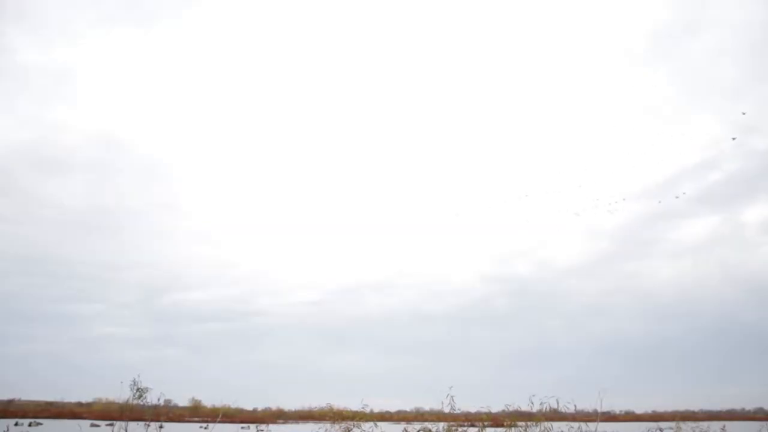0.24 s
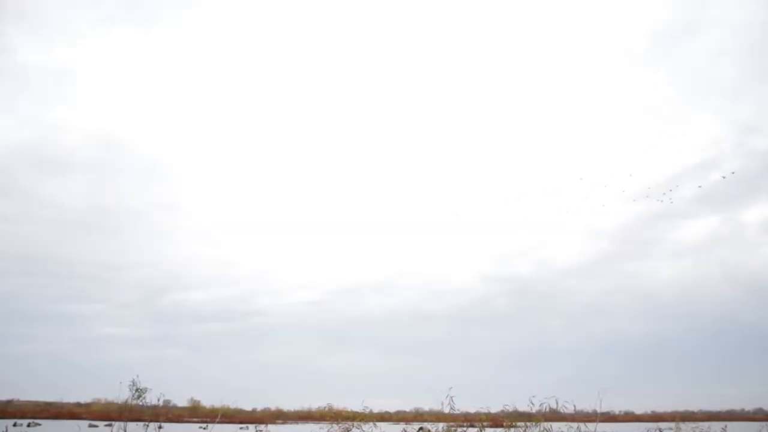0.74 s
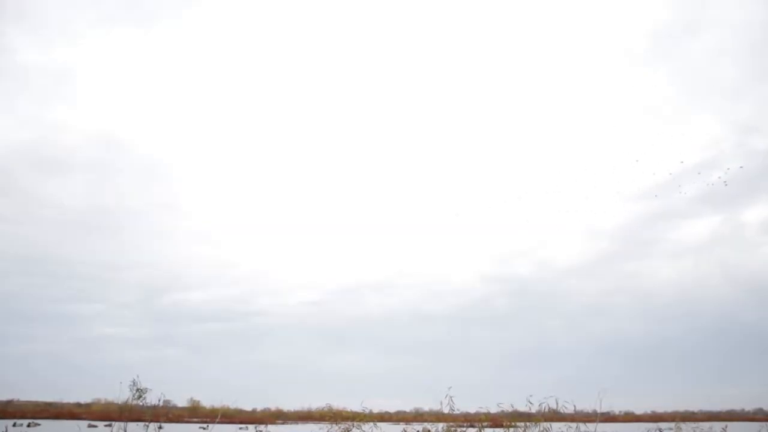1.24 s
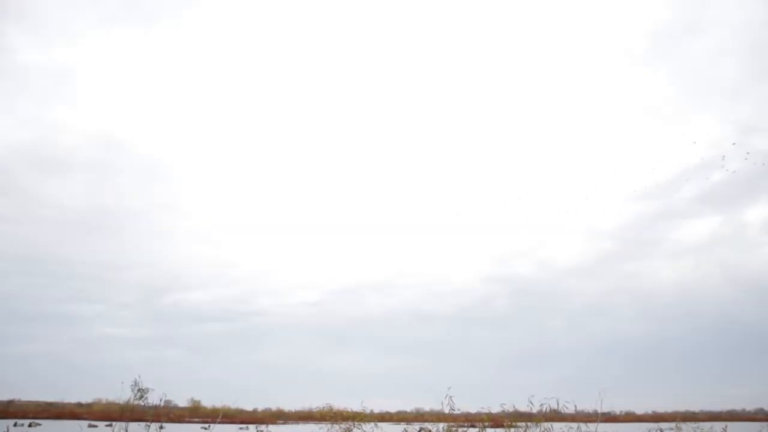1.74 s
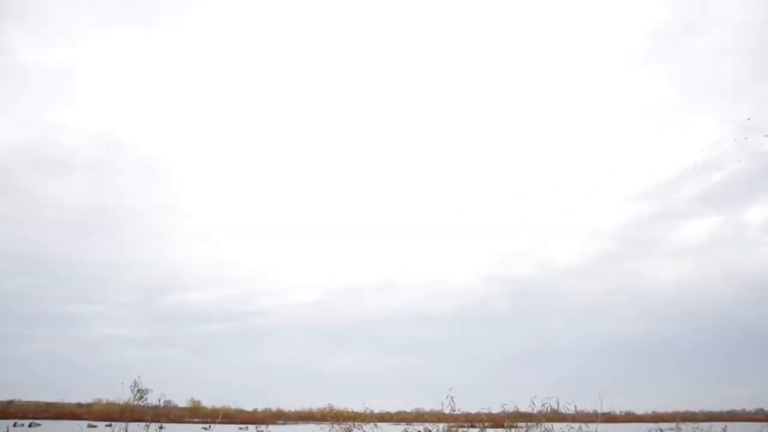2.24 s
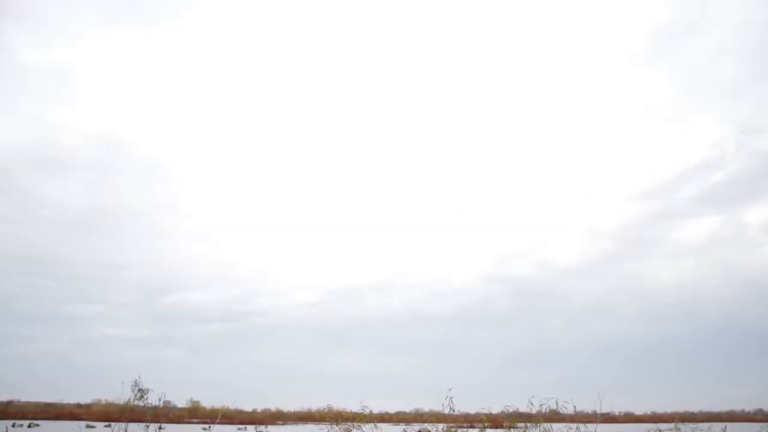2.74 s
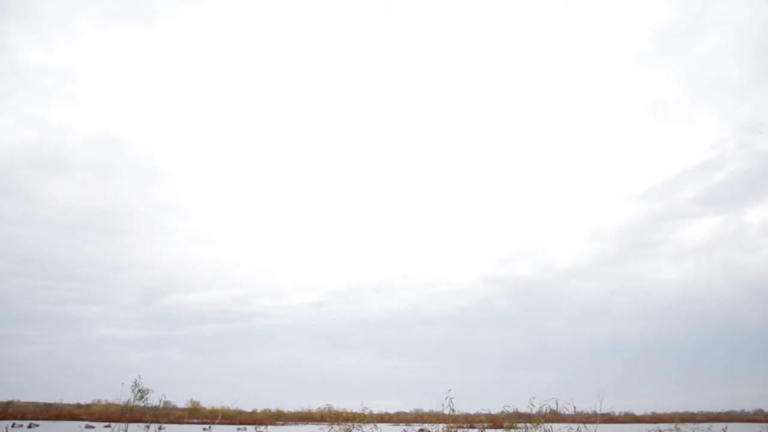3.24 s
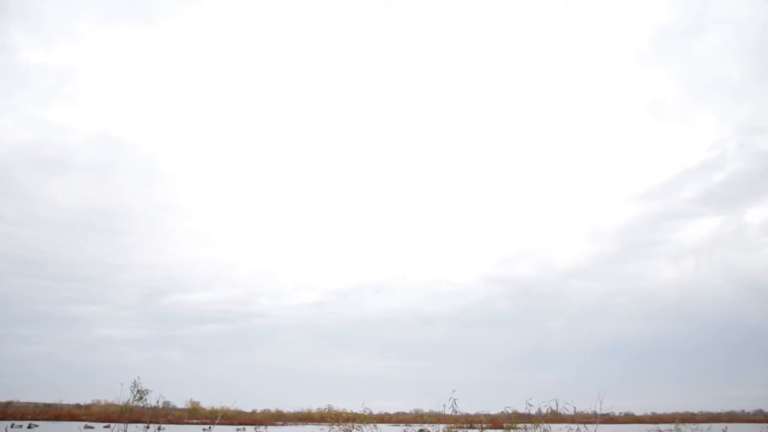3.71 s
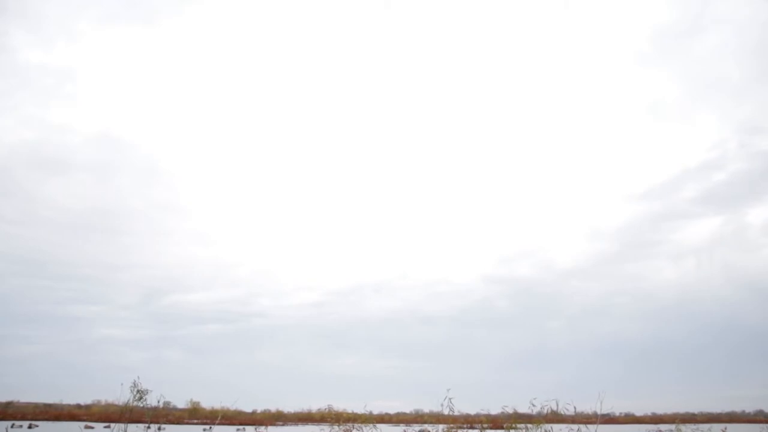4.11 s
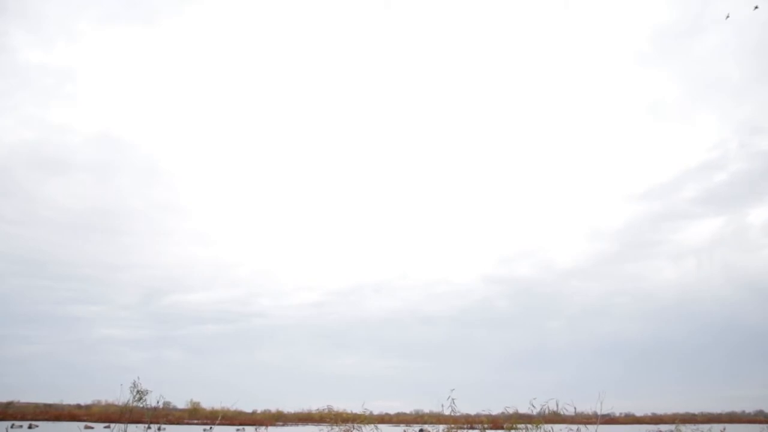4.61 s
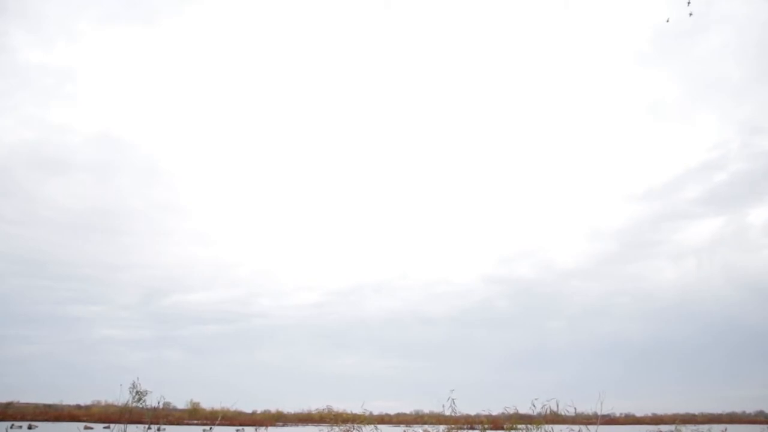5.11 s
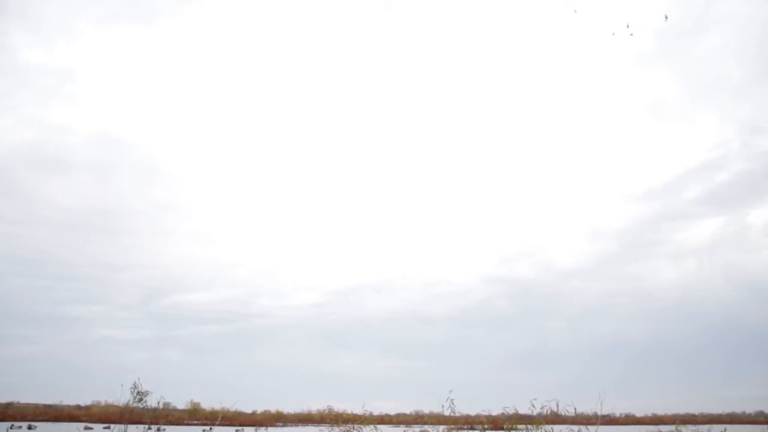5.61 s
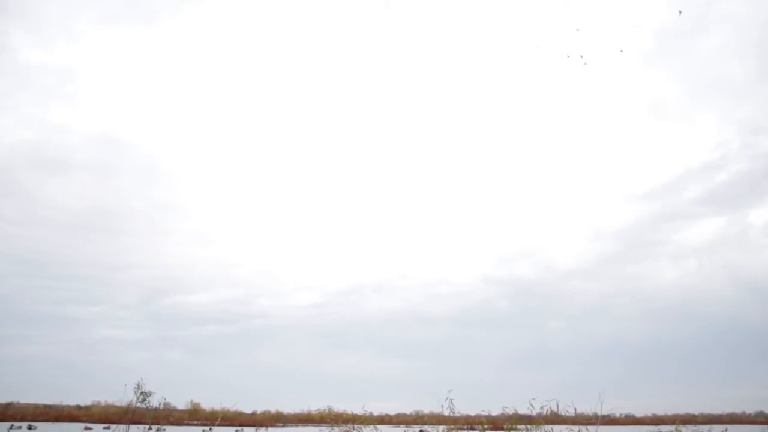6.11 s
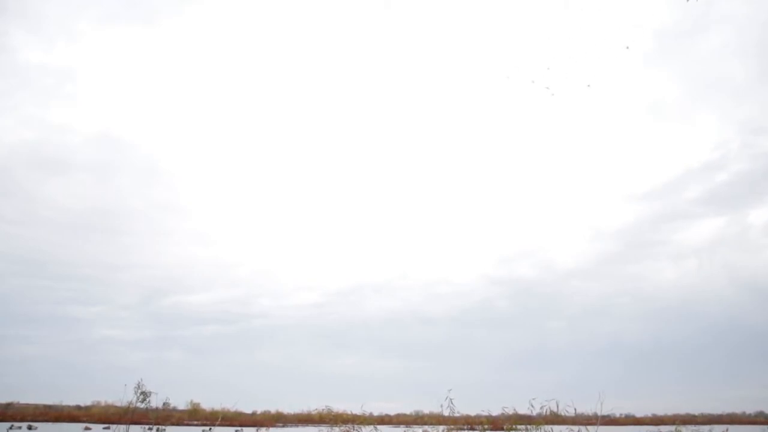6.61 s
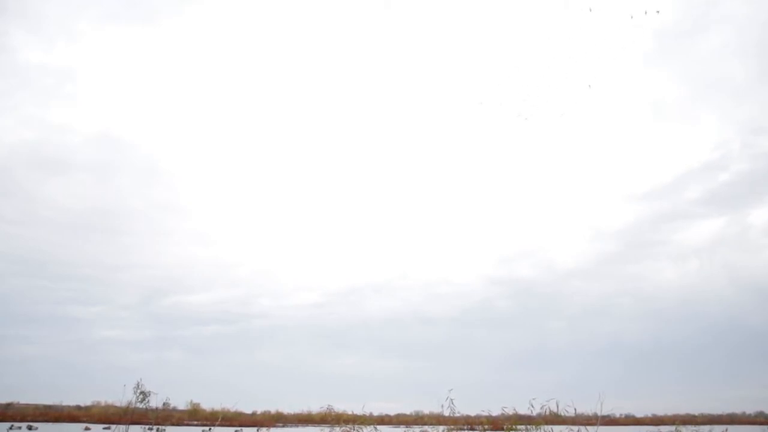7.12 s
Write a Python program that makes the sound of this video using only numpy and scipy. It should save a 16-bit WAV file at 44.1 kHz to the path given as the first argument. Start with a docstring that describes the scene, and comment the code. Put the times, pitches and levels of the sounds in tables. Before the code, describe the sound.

Quiet open marsh with a few faint duck quacks, soft camera button clicks, then a sleeve rustle, a loud buckle clack and a sharp plastic snap.

```python
"""Quiet marsh, handling close by

Far off: ducks quack, a waterbird cries (harmonics sagging in pitch), a hoot arches, dry ticks, a low drone.
At the microphone: air and hiss as steady coloured noise, a breeze as low noise with eddies and gusts.
Near: five camera button presses, made of spring ticks, rubbing noise, knocks and a body thud.
Close: a sleeve rustles as noise strokes, a buckle clacks and rattles as struck modes and scrapes,
and a plastic catch slides, then snaps shut as a ring and a crack."""
import sys
import numpy as np
from scipy import signal
from scipy.fft import rfft, irfft
from scipy.io import wavfile

SR = 44100
rng = np.random.default_rng(int(sys.argv[2]) if len(sys.argv) > 2 else 0)


def generate_wav(sig):
    """Save sig (samples, or channels by samples) to the path in sys.argv[1] as 16-bit PCM at SR."""
    pcm = np.round(np.clip(np.atleast_2d(sig).T, -1, 1) * 32767).astype(np.int16)
    wavfile.write(sys.argv[1], SR, pcm)


N = 324311
TIME = np.arange(N) / SR  # the whole scene, s
AGE = np.arange(8192) / SR  # time since the start of one short sound, s


def gain_of(db):
    """Amplitude factor for a level in dB."""
    return 10 ** (np.asarray(db) / 20)


def evened(x):
    """Scaled to rms 1."""
    return x / np.sqrt(np.mean(x ** 2) + 1e-20)


def unit(x):
    """Scaled to energy 1 in each channel."""
    return x / np.sqrt(np.sum(x ** 2, axis=-1, keepdims=True) + 1e-20)


def read(points, hz):
    """A spectrum table joined by straight lines over log frequency."""
    f, value = np.transpose(points)
    return np.interp(np.log(hz + 1), np.log(f + 1), value)


def add(mix, s, sound):
    """Mixes a sound in at time s."""
    part = mix[:, round(s * SR):][:, :sound.shape[-1]]
    part += sound[..., :part.shape[1]]


def sides(pan_db):
    """Left and right gains for a left-minus-right level difference."""
    gains = gain_of(np.array([[.5], [-.5]]) * pan_db)
    return gains / np.sqrt(np.mean(gains ** 2, axis=0))


def highpass(x, hz):
    """Second-order bass cut."""
    return signal.sosfilt(signal.butter(2, hz, "high", fs=SR, output="sos"), x)


def dying(t, t60):
    """Exponential decay by 60 dB in t60 seconds."""
    return np.exp(-np.log(1000) * t / t60)


def partly_alike(a, b, same):
    """Two channel spectra that share the fraction same, from -1 to 1."""
    return np.array([a, same * a + np.sqrt(1 - same ** 2) * b])


def noise(spectrum, same, pan_db=0):
    """Two channels of coloured, partly alike noise of rms 1."""
    a, b = rfft(rng.standard_normal((2, N)))
    pair = partly_alike(a, b, same) * sides(pan_db)
    colour = gain_of(read(spectrum, np.fft.rfftfreq(N, 1 / SR)))
    return evened(irfft(pair * colour, N))


def wobble(per_s, size=N):
    """A smooth random curve of rms 1, lowpassed at per_s Hz."""
    lowpass = signal.butter(2, per_s, fs=SR, output="sos")
    settled = signal.sosfilt(lowpass, rng.standard_normal(size + SR))[SR:]
    return evened(settled)


def coloured(x, hz, octaves):
    """A causal (minimum-phase) bell-shaped filter around hz."""
    f = abs(np.fft.fftfreq(x.shape[-1], 1 / SR)) + 1
    log_gain = np.maximum(-.5 * (np.log2(f / hz) / octaves) ** 2, -np.log(1000))  # floor at -60 dB
    response = np.exp(np.conj(signal.hilbert(log_gain)))
    return np.fft.ifft(np.fft.fft(x) * response).real


def mode(hz, t60, rise, delay=0):
    """One dying vibration that builds up over rise seconds."""
    t = np.maximum(AGE - delay, 0)
    return np.sin(2 * np.pi * hz * t) * (1 - np.exp(-t / rise)) * dying(t, t60)


def ring(modes, travel, low_hz, build_cycles=0.77):
    """Modes of a struck part, each built up over build_cycles; bending waves carry the high ones fastest."""
    top = max(m[0] for m in modes)
    body = 0
    for k, (hz, db, t60) in enumerate(modes):
        delay = travel * (np.sqrt(top / hz) - 1)
        body = body + (-1) ** k * gain_of(db) * mode(hz, t60, build_cycles / hz, delay)
    return unit(highpass(body, low_hz))


def burst(t60, low_hz=600, apart_hz=8000):
    """A dying scrape of noise, unlike at the two ports in the treble; small parts radiate no bass."""
    a, b = rfft(rng.standard_normal((2, len(AGE))))
    same = np.exp(-(np.fft.rfftfreq(len(AGE), 1 / SR) / apart_hz) ** 2)
    pair = irfft(partly_alike(a, b, same))
    return highpass(pair * (1 - np.exp(-AGE / 0.00049)) * dying(AGE, t60), low_hz)


def scatter(x, t60, hz, octaves):
    """Diffuse echoes from the surroundings: convolution with dying coloured noise."""
    t = np.arange(SR) / SR
    tail = rng.standard_normal((2, SR)) * (1 - np.exp(-t / 0.0067)) * dying(t, t60)
    return signal.fftconvolve(x, unit(coloured(tail, hz, octaves)), axes=1)[:, :N]


# still air and microphone hiss, relative spectrum: f/Hz, level/dB per Hz
AIR_SPECTRUM = [(12, -38), (20, -5), (42, -13), (85, -5.5), (113, -7), (167, -9), (240, -11), (386, -13),
                (496, -14.5), (637, -15), (1080, -16.5), (2120, -19), (4500, -18.5), (15800, -21)]
# likeness of the hiss at the two ports: f/Hz, correlation (0-1)
AIR_LIKENESS = [(40, 0), (150, 0.33), (400, 0.1), (1000, 0.14), (2500, 0.13), (6000, 0.0029), (15000, 0)]
# balance of the hiss: f/Hz, left minus right level/dB
AIR_BALANCE = [(40, -0.91), (150, 1), (1000, 0.98), (5000, -0.12), (15000, 0.12)]
# far drone over the open land, before its waver: t/s, level/dB
DRONE_SWELL = [(0, -80), (1.6, -76), (2.1, -75), (2.8, -70.5), (3.3, -69), (3.7, -74), (5.5, -76),
               (6.4, -71), (7.35, -73.5)]
# relative spectrum of the drone: f/Hz, level/dB per Hz
DRONE_SPECTRUM = [(100, -39), (300, -5), (440, -2.5), (560, -7), (900, -17), (3000, -59)]
HISS_DB = -54.58


def air(waver_db=2):
    """Steady wash and microphone hiss, with a far drone that swells, fades and wavers."""
    hz = np.fft.rfftfreq(N, 1 / SR)
    hiss = gain_of(HISS_DB) * noise(AIR_SPECTRUM, read(AIR_LIKENESS, hz), read(AIR_BALANCE, hz))
    swell_db = np.interp(TIME, *np.transpose(DRONE_SWELL)) + waver_db * wobble(7.1)
    return hiss + gain_of(swell_db) * noise(DRONE_SPECTRUM, 0.58)


# breeze on the microphone dropping to a lull, before eddies and gusts: t/s, level/dB
BREEZE_STRENGTH = [(0, -54), (.5, -52), (.92, -56), (1.3, -53), (2.0, -61), (2.6, -54.5), (2.76, -68.5),
                   (5.6, -69), (6.1, -62.5), (7.35, -70)]
# relative spectrum of the buffeting: f/Hz, level/dB per Hz
BUFFET_SPECTRUM = [(12, -12.5), (25, 0), (50, -1.5), (80, -7), (130, -19.5), (250, -32.5), (600, -41),
                   (2000, -83)]
# single gusts above the breeze: peak t/s, peak level/dB, left minus right level/dB
GUST_PEAKS = [(.45, -43, -9), (1.36, -48, -12), (1.64, -50, -19), (1.82, -43, -6), (2.2, -46, -11),
              (5.41, -62, -9), (5.95, -55.5, -16), (6.43, -60, -8)]
BREEZE_PAN_DB, GUST_S = -3, 0.037  # left minus right; time from a gust's peak to 1/e of its power


def breeze(lump_db=3.0, lumps_per_s=6.8, shared=0.27):
    """Eddies buffet each port, partly in step; single gusts add their power."""
    both, left, right = (wobble(lumps_per_s) for _ in range(3))
    eddies = np.sqrt(shared) * both + np.sqrt(1 - shared) * np.array([left, right])
    level_db = np.interp(TIME, *np.transpose(BREEZE_STRENGTH)) + lump_db * eddies
    power = (gain_of(level_db) * sides(BREEZE_PAN_DB)) ** 2
    for s, db, pan_db in GUST_PEAKS:
        power = power + (gain_of(db) * sides(pan_db)) ** 2 * np.exp(-((TIME - s) / GUST_S) ** 2)
    return np.sqrt(power) * noise(BUFFET_SPECTRUM, 0.11)


def tick(hz, t60, grit_db=-6, grit_hz=3050):
    """A small spring rings with a little grit; energy 1."""
    grit = unit(coloured(burst(2 * t60)[0], grit_hz, octaves=0.33))
    return unit(unit(mode(hz, t60, rise=0.00036)) + gain_of(grit_db) * grit)


# camera button presses: t/s, held/s, tick energy level/dB, firmness (0-1), body gives after/s, thud level/dB
BUTTON_PRESSES = [(.484, 0.071, -27.5, 0.82, 0.045, -11.5), (1.357, 0.063, -27.5, 0.7, 0.035, -16),
                  (2.5595, .0535, -25.5, 0.55, .05, -17), (3.6927, 0.042, -26.5, 0.06, .004, -22.5),
                  (4.7252, 0.038, -28.5, .1, 0.0068, -17.5)]
# modes of the button hitting bottom: f/Hz, relative level/dB, t60/s
BOTTOM_MODES = [(418, 0, 0.049), (467, -2, 0.14), (617, -5, 0.024)]
# modes of the camera body: f/Hz, relative level/dB, t60/s
BODY_MODES = [(123, 1, 0.18), (205, -12, 0.077), (313, -5, 0.052)]
SPRING_DOWN, SPRING_UP = (3220, .018), (3310, 0.0091)  # ring f/Hz, t60/s
CHATTER_S = .012  # the spring ticks again this long after the press
# energy levels at full firmness, and how far the bottom can come before the body gives
BOTTOM_DB, BOTTOM_LEAD_S, CLACK_DB = -15, .023, -24.5
SEAT_DB, SEAT_HZ, SEAT_T60_S = -24, 2760, 0.13  # the button rubs in its seat


def button(uneven_db=5):
    """A press ticks the spring down and up and thuds the body; firmness adds chatter, rubbing and a knock."""
    out = np.zeros((2, N))
    for s, held, db, firm, gives, thud_db in BUTTON_PRESSES:
        add(out, s, gain_of(db) * tick(*SPRING_DOWN))
        add(out, s + CHATTER_S, firm * gain_of(db) * tick(*SPRING_DOWN))
        add(out, s + held, gain_of(db) * tick(*SPRING_UP))
        slips = burst(SEAT_T60_S)[0] * gain_of(uneven_db * wobble(370, size=len(AGE)))
        add(out, s, firm * gain_of(SEAT_DB) * unit(coloured(slips, SEAT_HZ, octaves=0.57)))
        clack = gain_of(CLACK_DB) * unit(coloured(burst(0.04)[0], 1350, octaves=1.0))
        knock = gain_of(BOTTOM_DB) * ring(BOTTOM_MODES, travel=0, low_hz=150, build_cycles=.4) * sides(5.0)
        add(out, s + max(gives - BOTTOM_LEAD_S, 0), firm * (clack + knock))
        thud = ring(BODY_MODES, travel=0, low_hz=40, build_cycles=0.11) * sides(15.0)
        add(out, s + gives, gain_of(thud_db) * thud)
    return out


def quack(length, db, pitch_hz, throat_hz, rough=0.3, throat_octaves=0.29):
    """Jittery pulses, falling in pitch, and puffs of air pass the throat of a duck."""
    hz = pitch_hz * (1 - .1 * AGE / length + 0.041 * wobble(170, size=len(AGE)))
    turns = np.cumsum(hz) / SR
    pulses = evened(sum(np.cos(2 * np.pi * k * turns) for k in range(1, 18)))
    puffs = evened(np.exp(-(turns % 1) / 0.32) * rng.standard_normal(len(AGE)))
    voice = evened(coloured((1 - rough) * pulses + rough * puffs, throat_hz, throat_octaves))
    swell = np.sqrt(np.sin(np.pi * np.minimum(AGE / length, 1)).clip(0))
    return gain_of(db) * voice * swell


def clear_call(length, db, pitch_hz, partials, jitter, sag_hz_per_s=0, arch_hz=0, flutter_db=0.5):
    """A few harmonics swell and fade as their pitch sags or arches; the long path makes them flutter."""
    t = np.arange(0, length, 1 / SR)
    arch = np.sin(np.pi * t / length).clip(0)
    hz = pitch_hz - sag_hz_per_s * t + arch_hz * arch
    turns = np.cumsum(hz * (1 + jitter * wobble(80)[:len(t)])) / SR
    voice = sum(gain_of(level) * np.sin(2 * np.pi * k * turns) for k, level in partials)
    fluttering = voice * gain_of(flutter_db * wobble(25)[:len(t)])
    return gain_of(db) * evened(fluttering) * arch ** 0.4


# far duck quacks: t/s, length/s, level/dB before the swell, starting pitch f/Hz, throat f/Hz
DUCK_QUACKS = [(.640, 0.03, -56, 216, 1630), (0.836, 0.029, -57, 205, 1560), (0.9, 0.013, -67, 216, 1540),
               (0.962, 0.014, -61.5, 222, 1450)]
# faint dry ticks out in the marsh: t/s, energy level/dB, centre f/Hz, t60/s
MARSH_TICKS = [(.807, -36, 2050, .02), (1.127, -32, 2010, 0.027), (6.232, -30.5, 1820, 0.025),
               (7.24, -32.5, 2060, 0.023)]
# two notes of a waterbird: t/s, length/s, level/dB before the swell, starting pitch f/Hz
CRY_NOTES = [(1.364, 0.029, -55, 995), (1.394, 0.068, -58.5, 996)]
# harmonics of the cry: multiple of the pitch, relative level/dB
CRY_HARMONICS = [(1, -6), (2, 1)]
# one far hoot: t/s, length/s, level/dB before the swell, starting pitch f/Hz
FAR_HOOT = (5.75, .55, -68, 452)
# harmonics of the hoot: multiple of the pitch, relative level/dB
HOOT_HARMONICS = [(1, 0), (2, -11)]
CRY_SAG_HZ_PER_S, HOOT_ARCH_HZ = 750, 60


def birds(echo_db=-14):
    """Far voices and ticks with a faint diffuse echo from the reeds."""
    out = np.zeros((2, N))
    for s, *call in DUCK_QUACKS:
        add(out, s, quack(*call) * sides(-8))
    for s, db, hz, t60 in MARSH_TICKS:
        add(out, s, gain_of(db) * unit(coloured(burst(t60)[0], hz, octaves=0.24)))
    for s, *note in CRY_NOTES:
        cry = clear_call(*note, CRY_HARMONICS, jitter=0.019, sag_hz_per_s=CRY_SAG_HZ_PER_S)
        add(out, s, cry * sides(3.8))
    s, *note = FAR_HOOT
    hoot = clear_call(*note, HOOT_HARMONICS, jitter=0.011, arch_hz=HOOT_ARCH_HZ, flutter_db=3.5)
    add(out, s, hoot * sides(11.0))
    return out + gain_of(echo_db) * scatter(out, t60=0.27, hz=1500, octaves=2.3)


# sleeve strokes close by: fastest at t/s, rise/s, peak rub level/dB, peak swish level/dB
SLEEVE_STROKES = [(3.4, 0.12, -65, -80), (3.58, 0.019, -62, -54.5), (3.88, 0.17, -50.5, -52.5),
                  (3.989, 0.059, -62, -43.5), (4.25, 0.031, -64, -55), (4.44, 0.068, -55.5, -66.5),
                  (4.64, 0.12, -64, -58), (4.83, 0.092, -59.5, -70), (5.37, 0.1, -60.5, -62)]
# dull rub of the cloth, relative spectrum: f/Hz, level/dB per Hz
RUB_SPECTRUM = [(100, -8), (200, -3), (350, -1.5), (700, 0), (1000, 0.5), (1400, -4.5), (2200, -4.5),
                (4000, -10), (8000, -15), (16000, -38)]
# bright swish of the cloth, relative spectrum: f/Hz, level/dB per Hz
SWISH_SPECTRUM = [(500, -26), (2500, -5), (4500, -6.5), (9000, -4.5), (11500, -10), (16000, -19)]
SLOWING = 1.23  # a stroke dies away this many times more slowly than it rises


def sleeve(grain_db=1.5, snags_per_s=90, snag_db=-7):
    """Cloth slides in strokes of small uneven slips: a dull rub, a bright swish, threads that snag and let go."""
    s, rise, rub_db, swish_db = np.transpose(SLEEVE_STROKES)[:, :, None]
    speed = np.exp(-np.maximum(s - TIME, (TIME - s) / SLOWING) / rise)
    rub, swish = (np.linalg.norm(gain_of(db) * speed, axis=0) for db in (rub_db, swish_db))
    slips = evened(gain_of(grain_db * wobble(110)))
    snag_gains = gain_of(5.5 * np.minimum(rng.exponential(1, N), 2.5))
    snags = (rng.random(N) < snags_per_s / SR) * snag_gains
    thread = coloured(burst(.008), 2100, octaves=1.2)
    crackle = evened(signal.oaconvolve(snags[None], thread, axes=1)[:, :N])
    rubbing = rub * (slips * noise(RUB_SPECTRUM, 0.94) + gain_of(snag_db) * crackle)
    return rubbing + swish * slips * noise(SWISH_SPECTRUM, 0.18, 3.7)


# blows on the buckle: t/s, energy level/dB without the thump, centre f/Hz, spread/octaves, scrape t60/s
BUCKLE_BLOWS = [(3.386, -28.5, 895, 0.75, 0.0067), (3.75, -26, 1200, 0.71, 0.024),
                (3.7687, -17.5, 540, 0.41, 0.017), (3.7726, -20, 2000, 2.5, 0.023),
                (3.7771, 4.5, 3780, 2.3, 0.026), (3.894, -25, 7000, 1.1, 0.057),
                (3.9094, -18, 2200, 0.5, .008), (3.9404, -4.5, 9000, 1.04, 0.069),
                (3.953, -6, 6500, .9, 0.055), (3.962, -11.5, 1320, 0.34, .024),
                (3.973, 0, 5100, 0.53, 0.015), (4.008, -9, 7050, 1, 0.014), (4.0426, -22, 8000, 1.1, 0.016),
                (4.0957, -21.5, 8000, 0.64, 0.055), (4.124, -29, 1490, 0.59, .017)]
# modes of the buckle before each blow's colour: f/Hz, relative level/dB, t60/s
BUCKLE_MODES = [(414, -3, 0.018), (1050, 2.5, 0.017), (1806, 7.5, 0.012), (2270, -7, 0.018),
                (2680, -6, 0.02), (3150, -6, 0.015), (3675, -6, 0.012), (4150, -1, 0.014), (4620, -7, .01),
                (5110, -6.5, 0.01), (6150, -4, 0.015), (6740, 0, 0.0058), (7120, -6, .009),
                (8000, -1.5, 0.0088), (9680, -3.5, 0.02), (12900, -15, 0.0087)]
# the buckle swings from near the middle to the left: t/s, left minus right level/dB
BUCKLE_SWING = [(3.8, 1.1), (3.9, .5), (3.94, 5.5)]
RING_FROM_DB = -1  # light blows mostly scrape; those above this level mostly ring
THUMP, THUMP_DB = (280, 0.012), -27  # each blow also thumps the strap: (f/Hz, t60/s), dB relative to the blow
PORT_LAG_S_PER_DB = 1 / 150000  # the left port lags more with every dB of leftward level difference


def buckle():
    """Each blow rings the buckle and scrapes it; blows off to one side reach the two ports out of step."""
    out = np.zeros((2, N))
    body = ring(BUCKLE_MODES, travel=0.00047, low_hz=280)
    thump = gain_of(THUMP_DB) * unit(mode(*THUMP, rise=0.0009))
    bins = np.fft.rfftfreq(len(AGE), 1 / SR)
    for s, db, hz, octaves, t60 in BUCKLE_BLOWS:
        scrape_share = 1 / (1 + gain_of(db - RING_FROM_DB) ** 2)  # of the energy
        pan_db = np.interp(s, *np.transpose(BUCKLE_SWING))
        rough = coloured(burst(t60, low_hz=350), 3200, octaves=3.3)
        scrape = np.sqrt(scrape_share) * unit(coloured(rough, hz, octaves))
        ringing = np.sqrt(1 - scrape_share) * unit(coloured(body, hz, octaves))
        blow = ringing + scrape + thump
        lag = np.array([[1], [0]]) * PORT_LAG_S_PER_DB * max(pan_db, 0)
        lagged = irfft(rfft(blow) * np.exp(-2j * np.pi * bins * lag))
        add(out, s, gain_of(db) * lagged * sides(pan_db))
    return out


# modes of the plastic catch: f/Hz, relative level/dB, t60/s
CATCH_MODES = [(760, -8.5, 0.027), (1130, -12.5, .008), (1854, -2.5, 0.02), (2260, -3, 0.01),
               (2666, -1, 0.012), (2790, 5, 0.0096), (3270, -3, 0.02), (3970, -0.5, 0.01),
               (4600, -9, 0.0059), (4900, -4.5, 0.011), (5660, -4.5, 0.016), (6550, -4, 0.013),
               (7200, 3, 0.0094), (8000, -11, 0.0074), (8900, -7, 0.014), (9800, -10, .009),
               (11000, -17, 0.01)]
SNAP_S, SNAP_DB = 5.0708, 8  # time, energy level of the ring


def catch(crack_db=-9.0, slide_db=-21, slide_s=.0007):
    """The catch slides over its lip, then snaps home and rings briefly; crack and slide are relative to the ring."""
    out = np.zeros((2, N))
    slide = unit(coloured(burst(.005), 5800, octaves=0.86))
    add(out, SNAP_S - slide_s, gain_of(slide_db) * slide)
    crack = unit(coloured(burst(0.019, low_hz=900), 3600, octaves=1.4))
    add(out, SNAP_S, ring(CATCH_MODES, travel=0.00026, low_hz=600) + gain_of(crack_db) * crack)
    return gain_of(SNAP_DB) * out


def scene(ground_db=-32):
    """Marsh, breeze and handling together; buckle and catch also scatter faintly off the ground."""
    near = buckle() + catch()
    ground = gain_of(ground_db) * scatter(near, t60=0.083, hz=3620, octaves=0.81)
    return air() + breeze() + button() + birds() + sleeve() + near + ground


EDGE_HZ = 15850


def record(dry):
    """The band limit of the recorder: a steep lowpass at EDGE_HZ."""
    lowpass = signal.firwin(511, EDGE_HZ, window=("kaiser", 9), fs=SR)
    return signal.oaconvolve(dry, lowpass[None], "same")


dry = scene()
out = record(dry)
generate_wav(out)
```